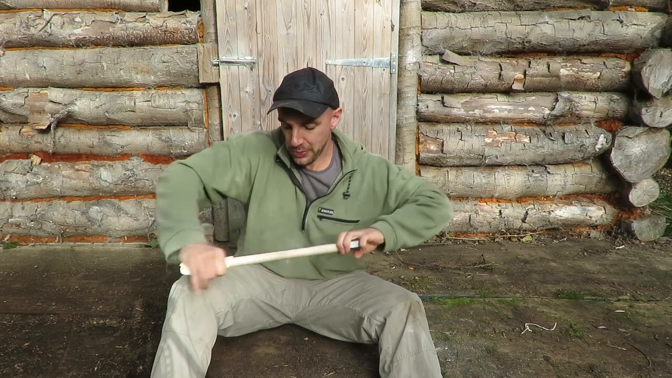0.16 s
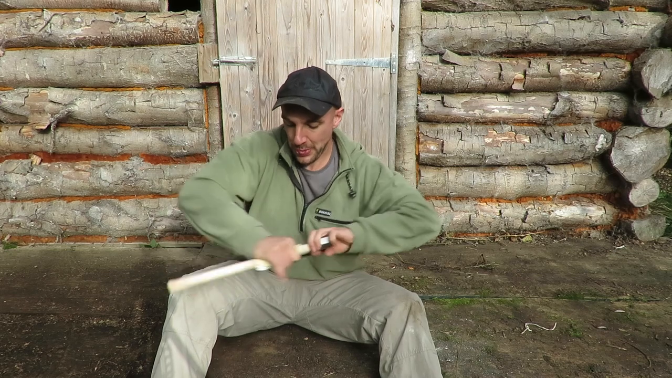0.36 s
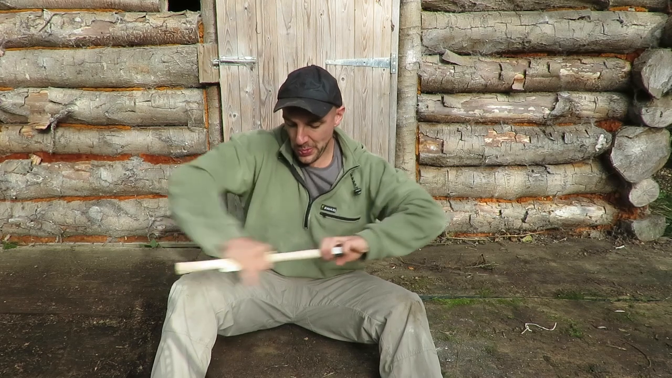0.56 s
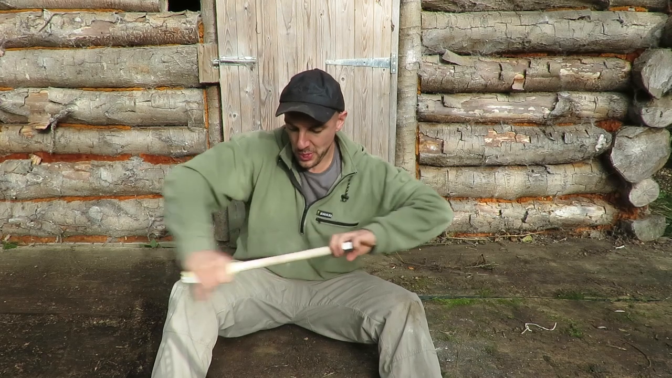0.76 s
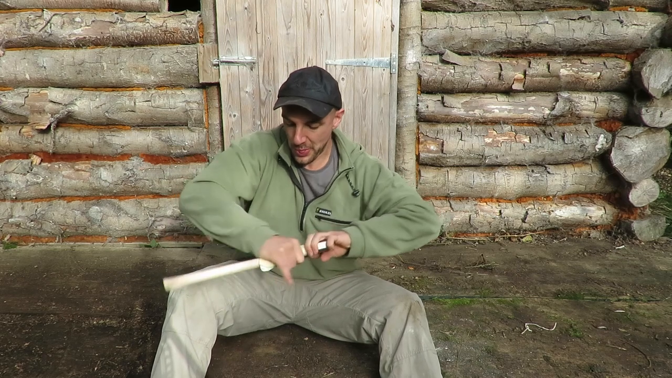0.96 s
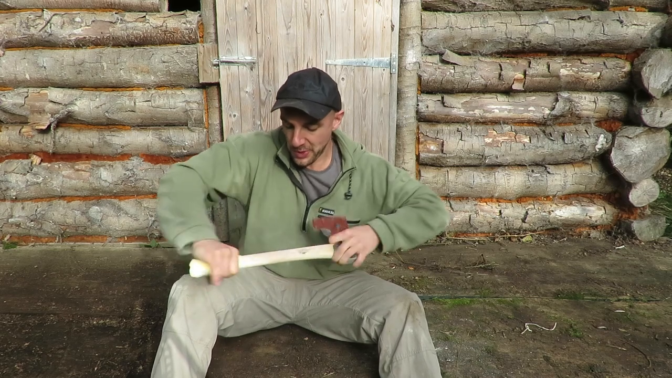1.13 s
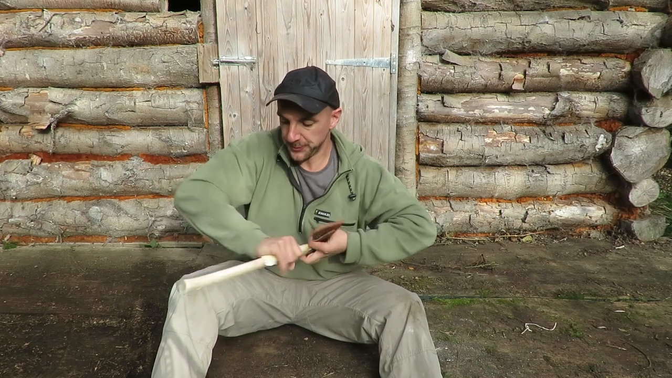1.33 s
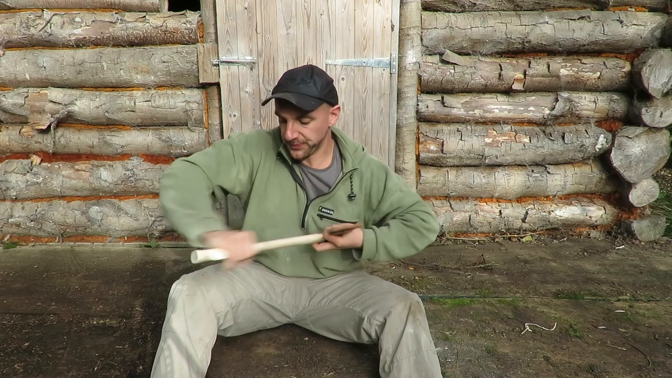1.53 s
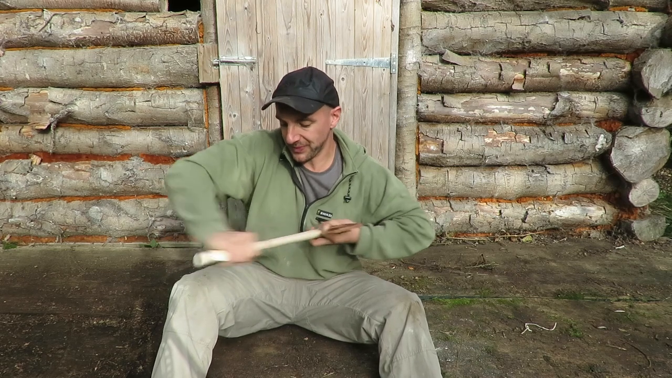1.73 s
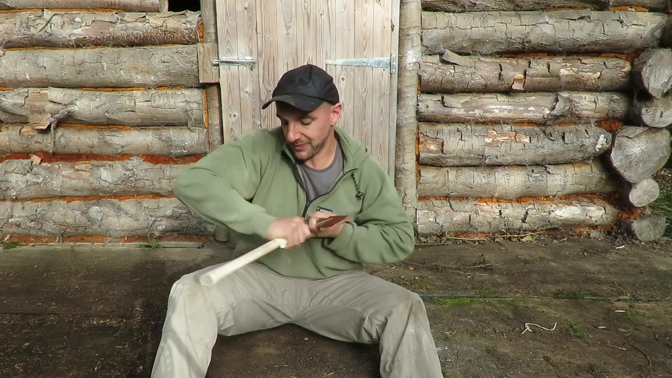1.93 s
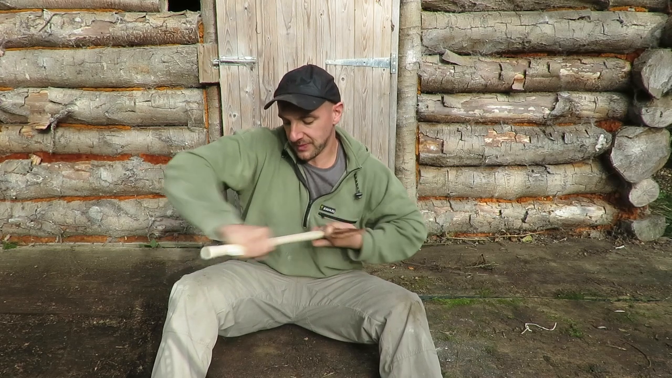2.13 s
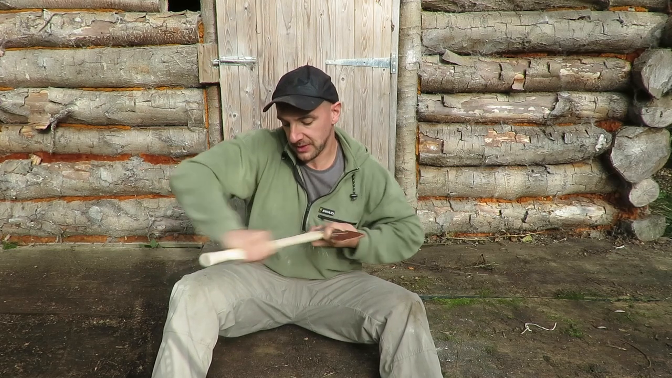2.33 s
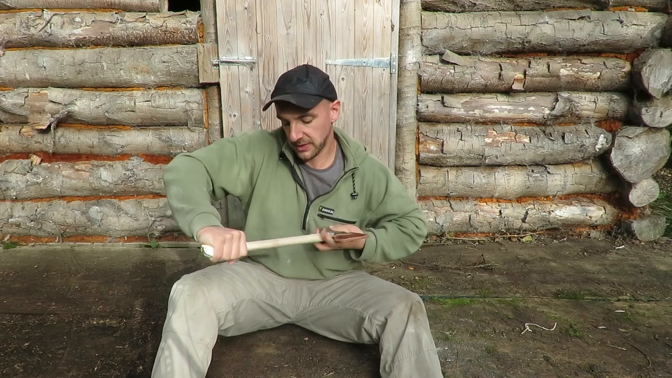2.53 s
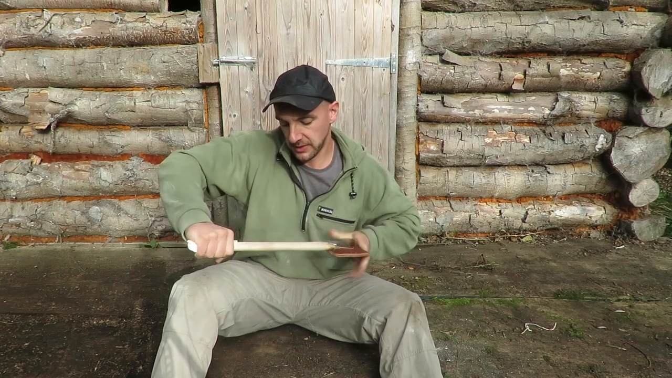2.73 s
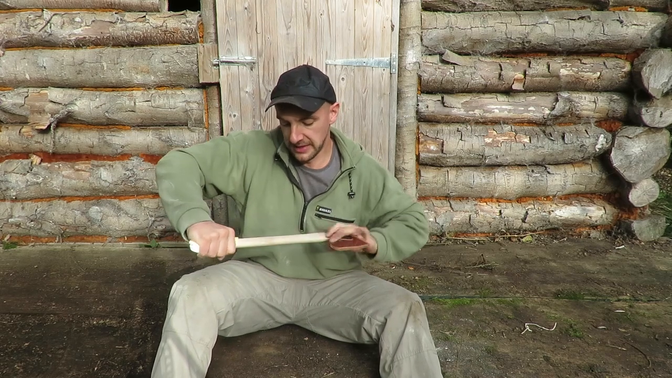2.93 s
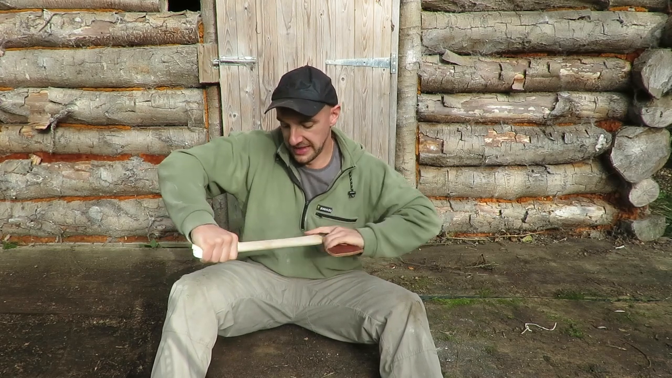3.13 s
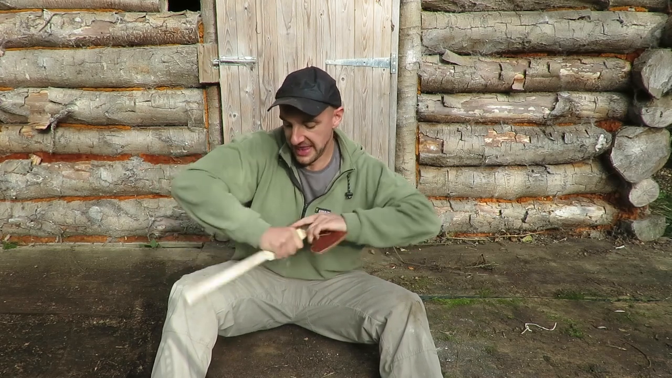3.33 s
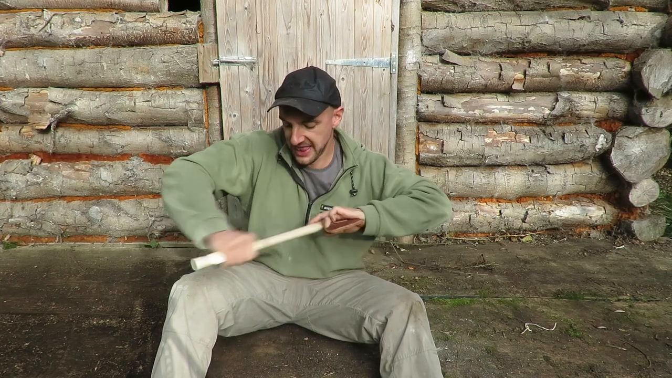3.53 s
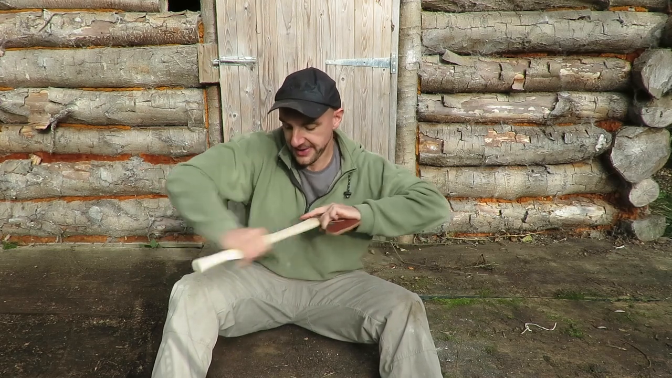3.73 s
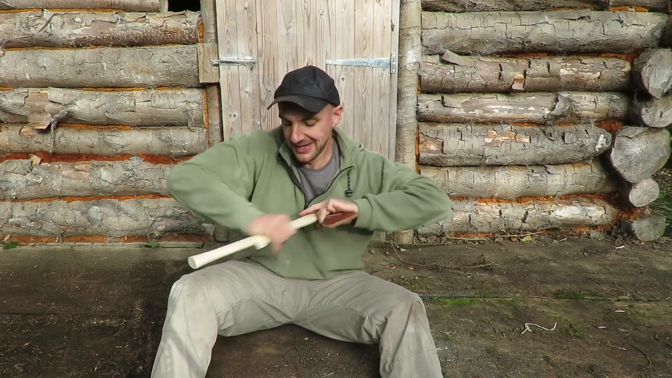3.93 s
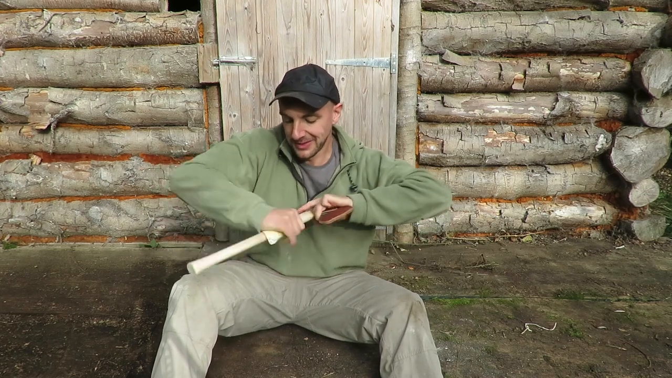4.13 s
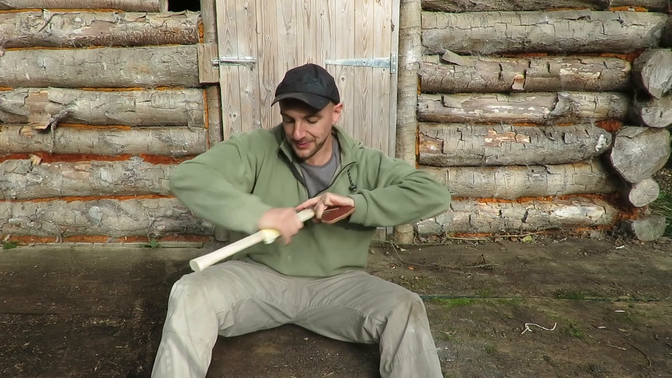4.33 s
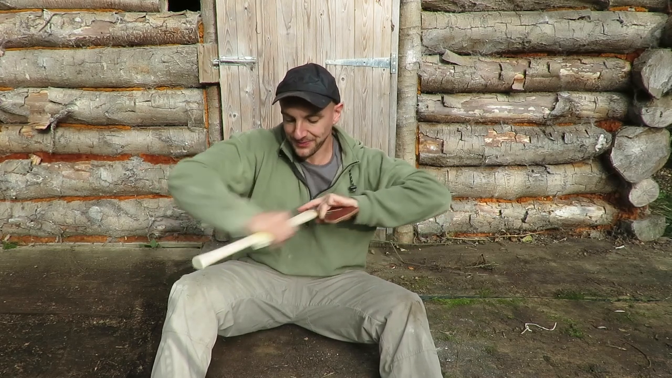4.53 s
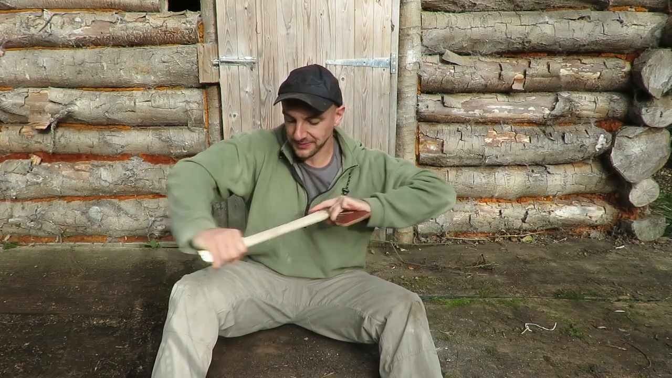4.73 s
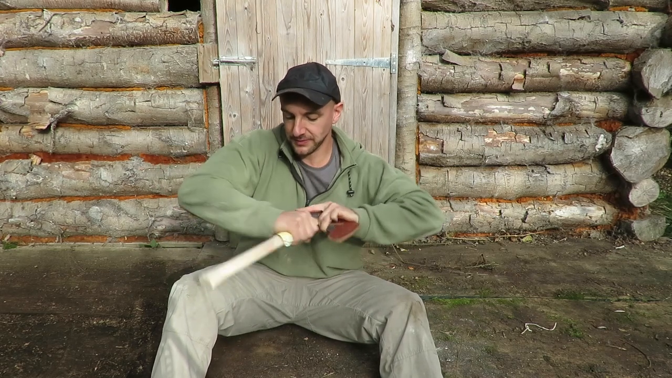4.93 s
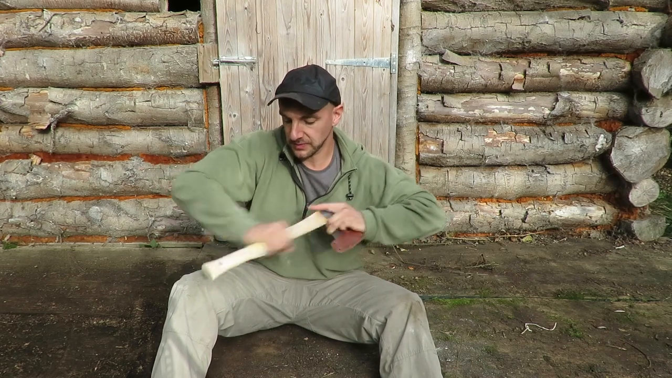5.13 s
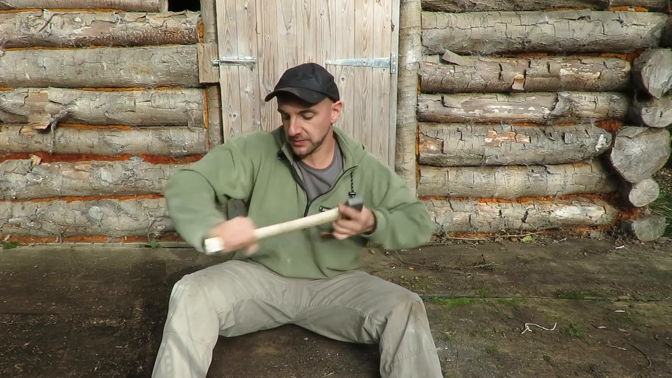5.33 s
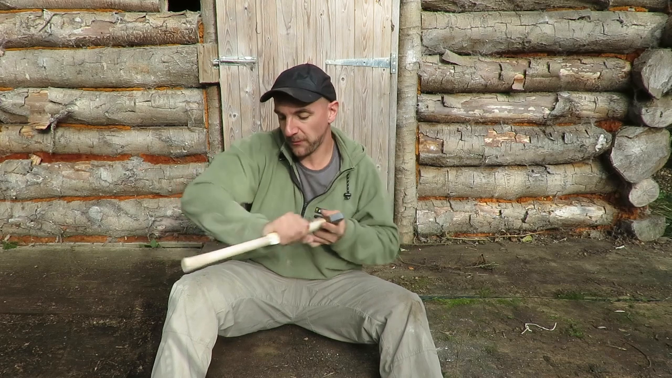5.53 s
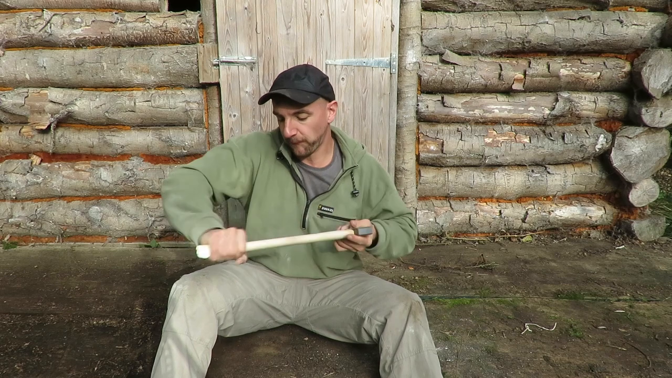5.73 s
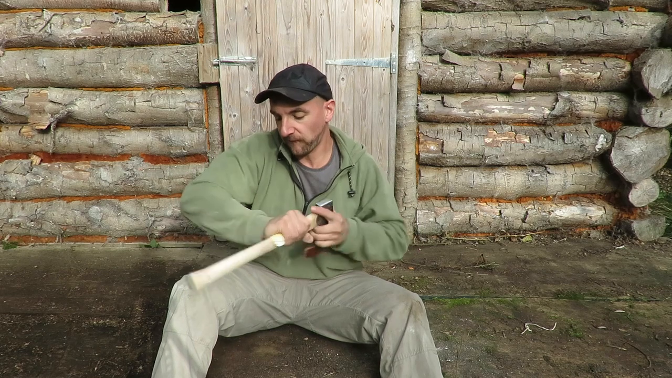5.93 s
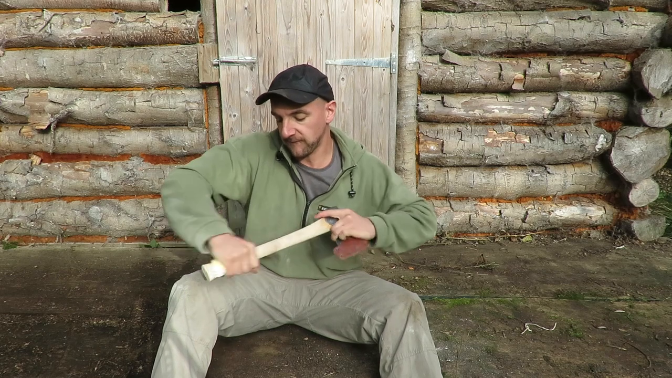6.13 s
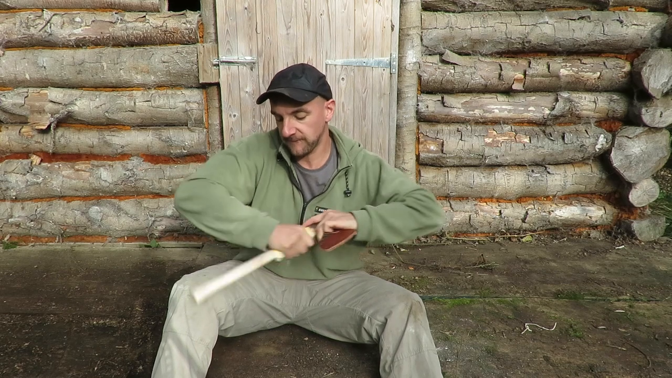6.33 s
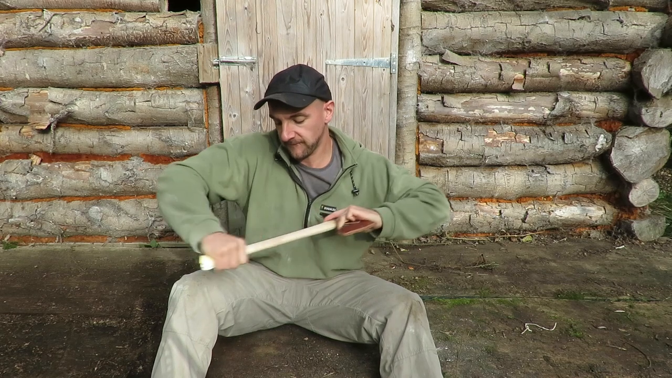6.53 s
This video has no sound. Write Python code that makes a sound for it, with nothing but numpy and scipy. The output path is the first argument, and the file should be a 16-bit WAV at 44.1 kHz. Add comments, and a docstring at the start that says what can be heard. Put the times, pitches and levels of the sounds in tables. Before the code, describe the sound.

Quick, hissing sandpaper strokes rasp on a wooden handle, pause briefly and resume, with soft outdoor air and a far idling engine underneath.

```python
"""Outdoors by a log wall, coarse sandpaper on a wooden handle is rubbed quickly back and forth,
with one short rest. Countless grit scratches hiss, the handle rasps, and the cupped sheet rings
and now and then chatters or snags. The wall close behind throws back a short answer;
a far idling engine and a soft outdoor rush lie underneath."""
import sys
import numpy as np
from scipy import signal
from scipy.fft import rfft, irfft, next_fast_len
from scipy.io import wavfile
from scipy.ndimage import uniform_filter1d, map_coordinates

SR = 44100
rng = np.random.default_rng(int(sys.argv[2]) if len(sys.argv) > 2 else 0)


def waveform_to_disk(signal):
    """Save audio, clipped to [-1, 1], as 16-bit WAV at the path in sys.argv[1]."""
    frames = np.transpose(np.atleast_2d(signal))
    scaled = np.clip(frames, -1, 1) * 32767
    samples = np.round(scaled).astype(np.int16)
    wavfile.write(sys.argv[1], SR, samples)


N = 289825

# The arm's strokes. Each row: start and end in seconds, grit level in dB, its growth over the stroke in dB.
STROKES = [(-.007, 0.119, -19.5, -6), (.127, .274, -18, 4.5), (0.287, .439, -21.5, 3),
           (0.447, .597, -19, 3.5), (0.604, .751, -20.5, 1.5), (0.761, 0.906, -19.5, 3),
           (0.915, 1.071, -23, 4), (1.081, 1.222, -20, 5.5), (1.233, 1.416, -19.5, -4),
           (1.432, 1.586, -22.5, 9), (1.602, 1.742, -22, 4), (1.758, 1.888, -20, 3),
           (1.894, 2.034, -22.5, 4.5), (2.042, 2.177, -21.5, 15), (2.189, 2.331, -22, 7),
           (2.335, 2.501, -21.5, 14), (3.243, 3.401, -23, 11), (3.423, 3.583, -21, 8),
           (3.599, 3.742, -23, 5.5), (3.762, 3.896, -20, 7), (3.897, 4.01, -20, 2), (4.025, 4.14, -20.5, 1),
           (4.14, 4.244, -19.5, -2), (4.255, 4.362, -19.5, -7.5), (4.363, 4.467, -22, -2.5),
           (4.474, 4.585, -22, 7.5), (4.586, 4.697, -20.5, 0), (4.712, 4.865, -20.5, 7),
           (4.905, 5.064, -21, 4), (5.17, 5.352, -20, 2.5), (5.346, 5.585, -24, 21),
           (5.631, 5.774, -20.5, 20), (5.833, 5.989, -21.5, 2), (6.012, 6.201, -21.5, 15),
           (6.198, 6.4, -25.3, 9), (6.415, 6.577, -22.5, 16.5)]
STROKE_S, COAST = 0.16, 1.05  # an ordinary stroke's length; extra braking time per second beyond it


def amp(db):
    """Decibels to gain."""
    return 10 ** (np.asarray(db) / 20)


def unit(x):
    """Scale to rms 1."""
    return x / np.sqrt(np.mean(x ** 2) + 1e-20)


def clock():
    """Each sample's time in seconds."""
    return np.arange(N) / SR


def along(points, hz):
    """Read (Hz, value) points on a log frequency axis."""
    point_hz, values = np.transpose(points)
    return np.interp(np.log(hz + 1), np.log(point_hz + 1), values)


def wobble(rate):
    """A smooth random curve, rate knots a second."""
    return map_coordinates(rng.standard_normal(int(N * rate / SR) + 4), [clock() * rate])


def filtered(x, response):
    """Filter x by a gain given as a function of frequency."""
    size = next_fast_len(N + SR // 2)
    return irfft(rfft(x, size) * response(np.fft.rfftfreq(size, 1 / SR)), size)[..., :N]


def coloured(x, spectrum):
    """Shape x with an EQ curve of (Hz, dB) points, at rms 1."""
    return unit(filtered(x, lambda hz: amp(along(spectrum, hz))))


def swell(middle, length):
    """A smooth bump, length seconds wide at half height."""
    return np.cos(np.pi / 2 * np.clip((clock() - middle) / length, -1, 1)) ** 2


def scratches(rate):
    """Tiny impacts of random size at random moments, rate a second."""
    return unit(rng.standard_normal(N) * (rng.random(N) < rate / SR))


def outdoor_rush():
    """A soft bed of air, almost the same in both ears."""
    # The tone of the air. Each row: frequency in Hz, relative level in dB.
    air_eq = [(15, -42), (25, -19), (42, 8), (52, -14), (68, -6.5), (140, -1), (180, -3.5), (330, -8.5),
              (480, -9), (1000, -8), (1500, -12.5), (2300, -21.5), (6000, -24.5), (15500, -29)]
    side_eq = [(40, -27), (150, 1.5), (400, 9.5), (900, -7.0), (4000, -32.0)]
    mid = amp(-42.5) * coloured(rng.standard_normal(N), air_eq)
    side = amp(-62) * coloured(rng.standard_normal(N), side_eq)
    return mid + side * np.array([[1], [-1]])


def far_engine():
    """An idling engine fires three times a turn; only its lowest orders carry, wavering with the air."""
    # The drifting idle. Each row: time in seconds, firing rate in Hz.
    idle = [(0, 56.95), (1.2, 58.4), (2.2, 56.8), (3.1, 58.5), (4.3, 56.6), (6.57, 60.5)]
    # The hum's partials. Each row: multiple of the shaft's turning rate, level in dB.
    partials = [(2, -57), (3, -43.5), (4, -52), (5, -56), (7, -53.5)]
    firing_hz = np.interp(clock(), *np.transpose(idle)) * (1 + .015 * wobble(6))
    turns = np.cumsum(firing_hz) / SR / 3
    hum = np.zeros(N)
    for order, db in partials:
        gain = np.sqrt(2) * amp(db + 2.4 * wobble(7.1))
        hum += gain * np.sin(2 * np.pi * (order * turns + rng.random()))
    return hum


def wall_answer(x):
    """The log wall and the boards scatter a short tail, 5 ms late."""
    # The tail's decay. Each row: frequency in Hz, seconds to fall 60 dB.
    decay = [(200, 0.18), (2000, 0.12), (12000, 0.27)]
    hz, t, noise = signal.stft(rng.standard_normal(SR // 3), SR, nperseg=256)
    tail = signal.istft(noise * amp(-60 * t / along(decay, hz)[:, None]), SR, nperseg=256)[1]
    return signal.fftconvolve(x, np.pad(tail, (SR // 200, 0)) / np.linalg.norm(tail))[:N]


def paper_rustle():
    """Between strokes the paper shifts faintly in the resting hand."""
    # Each row: middle and length in seconds, level in dB.
    shifts = [(2.834, 0.071, -49), (3.082, .1, -45), (3.226, 0.083, -48.5), (4.899, 0.029, -39),
              (5.135, 0.15, -45)]
    rustle_eq = [(500, -6), (2500, 0), (5000, -7), (11000, -10.5), (15500, -13)]
    rustle = coloured(scratches(rate=3700), rustle_eq)
    return sum(amp(db) * swell(middle, length) for middle, length, db in shifts) * rustle


def handle():
    """The hand-damped wood knocks dully when shoved and squeaks once as the grip turns."""
    # The wood's modes. Each row: pitch in Hz, relative level in dB, seconds to fall 60 dB.
    modes = [(286, -24, 0.0086), (487, 2, 0.0068), (840, 3.5, 0.016), (1280, 1.5, 0.013)]
    # The hand's shoves. Each row: start in seconds, peak in dB.
    knocks = [(1.252, -9), (6.418, -16.5)]
    # A low, falling squeak. Each row: middle and length in seconds, level in dB, first and last pitch in Hz.
    squeaks = [(3.415, .022, -31.5, 405, 325)]
    out, t = np.zeros(N + SR), np.arange(SR // 8) / SR
    ring = sum(amp(db - 60 * t / t60) * np.sin(2 * np.pi * hz * t) for hz, db, t60 in modes)
    for start, db in knocks:
        out[round(start * SR):][:len(t)] += amp(db) * ring / np.abs(ring).max()
    for middle, length, db, first_hz, last_hz in squeaks:
        pitch = np.interp(clock(), [middle - length, middle + length], [first_hz, last_hz])
        out[:N] += amp(db) * swell(middle, length) * np.sin(2 * np.pi * np.cumsum(pitch) / SR)
    return out[:N]


def snags():
    """A caught grain snaps free with a bright crack and a very short ring."""
    # Each row: start in seconds, peak in dB ahead of the low cut, pitch in Hz.
    grains = [(2.706, -26, 3140), (2.822, -29, 6600), (2.826, -31, 3700), (3.042, -25, 2600),
              (4.305, -2, 4230), (4.565, -14, 9800), (6.343, -2, 4700)]
    out, t = np.zeros(N + SR), np.arange(SR // 20) / SR
    for start, db, hz in grains:
        snap = (np.sin(2 * np.pi * hz * t) + .5 * rng.standard_normal(len(t))) * amp(-60 * t / 0.0082)
        out[round(start * SR):][:len(t)] += amp(db) * snap / np.abs(snap).max()
    # so small a source radiates no bass
    return signal.sosfilt(signal.butter(2, 1700, "high", fs=SR, output="sos"), out[:N])


def grip(seconds):
    """The cupped sheet's pitch and level: a looser grip lets it ring lower and louder."""
    # Each row: time in seconds, ring pitch in Hz, sheet level against the grit in dB.
    grip_curve = [(0, 2128, -10), (1.28, 2100, -6), (1.42, 2000, -11.5), (3.3, 2141, -11),
                  (4.3, 2268, -10.5), (5.04, 2150, -9.5), (5.19, 1519, -6), (5.32, 1723, -1),
                  (5.48, 1894, -11), (5.72, 1447, -9.5), (5.95, 1887, -12.5), (6.14, 1518, -2),
                  (6.23, 1847, -1.5), (6.5, 2154, -9)]
    times, hz, db = np.transpose(grip_curve)
    return np.interp(seconds, times, hz), np.interp(seconds, times, db)


def judders(lead_s=0.022, length_s=0.026, trim_db=-1.5, scatter_db=1.2, pitch_ratio=0.91, detune=0.063):
    """The sheet sticks and slips as each stroke brakes: one row of chatter per stroke."""
    rows = []
    for start, end, db, _ in STROKES:
        force, bend = rng.standard_normal(2)
        middle = end - lead_s - COAST * max(end - start - STROKE_S, 0) / 2
        ring_hz, sheet_db = grip(middle)
        level_db = db + sheet_db + trim_db + scatter_db * force
        rows.append((middle, length_s, level_db, ring_hz * pitch_ratio * np.exp(detune * bend)))
    return rows


def chatter():
    """Bursts of rapid slips ring the cupped sheet, in hard grabs and at the end of each stroke."""
    # The hard grabs. Each row: middle and length in seconds, relative level in dB, ring pitch in Hz.
    grabs = [(0.886, 0.024, -36, 1510), (1.268, .024, -15.5, 1720), (1.295, .046, -18.5, 2320),
             (2.322, 0.0072, -31, 1710), (3.389, .01, -24, 2260), (4.933, 0.028, -22, 2520),
             (5.321, .035, -26.5, 1630), (6.346, 0.014, -20, 2300)]
    out, t = np.zeros(N), np.arange(SR // 50) / SR
    for middle, length, db, hz in grabs + judders():
        shape = swell(middle, length)
        on = shape > 1e-6
        # the sheet takes a few cycles to answer, so a slip carries no thump
        ring = t * np.sin(2 * np.pi * hz * t) * amp(-60 * t / 0.0025)
        slips = rng.standard_normal(on.sum()) * (rng.random(on.sum()) < 2500 / SR)
        out[on] += amp(db - 2.5) * shape[on] * unit(signal.fftconvolve(slips, ring)[:on.sum()])
    return out


def cup_ring(braking, width_hz=330, sag=0.15, firm_db=-4.5, db_per_octave=5):
    """The cupped sheet's narrow resonance follows the grip and sags as braking slackens the paper."""
    pitch = grip(clock())[0]
    phase = 2 * np.pi * np.cumsum(pitch * (1 - sag * braking)) / SR
    slow_noise = filtered(rng.standard_normal((2, N)), lambda hz: 1 / (1 + 1j * hz / width_hz) ** 2)
    ring = unit(slow_noise[0] * np.cos(phase) + slow_noise[1] * np.sin(phase))
    octaves_down = np.log2(np.median(pitch) / pitch)
    return amp(firm_db + db_per_octave * octaves_down) * ring


def flexing(x, depth_db, bins, frames=4):
    """The bending sheet and the moving fingers shift many small resonances about."""
    spectra = signal.stft(x, nperseg=1024)[2]
    ripple = uniform_filter1d(rng.standard_normal(spectra.shape), bins, axis=0)
    ripple = uniform_filter1d(ripple, frames, axis=1)
    return signal.istft(spectra * amp(depth_db * unit(ripple)), nperseg=1024)[1][:N]


def arm(rise_s=0.054, brake_s=0.029, jump=0.27, speed_power=1.084):
    """Grit, rasp and sheet gains, speed and braking as the hand breaks loose, speeds up and stops."""
    # How firmly the paper bears on the wood. Each row: time in seconds, rasp against the grit in dB.
    seating = [(0, -4.5), (1.3, -3), (1.72, -0.4), (2.25, -4.5), (3.35, -3.3), (3.5, -4), (4.27, -2),
               (4.85, -2.5), (5.9, -4), (6.5, -3)]
    growth_shares = [1, 0.81, 0.13]  # how much grit, rasp and sheet follow the hand's pressure
    t, gains, speed, braking = clock(), np.zeros((3, N)), np.zeros(N), np.zeros(N)
    ease = lambda u: np.sin(np.pi / 2 * np.clip(u, 0, 1))
    for start, end, db, growth_db in STROKES:
        on = (t > start) & (t < end)
        age, left, length = t[on] - start, end - t[on], end - start
        rise = rise_s * (length / STROKE_S) ** 1.37
        brake = brake_s + COAST * max(length - STROKE_S, 0)
        # static friction lets go at once, so the stroke jumps to part of its speed
        release = np.clip(age / 0.0083, 0, 1)
        speed[on] = release * (jump + (1 - jump) * ease(age / rise)) * ease(left / brake)
        press_db = growth_db * (age / length - .5)
        gains[:, on] += speed[on] ** speed_power * amp(db + np.outer(growth_shares, press_db))
        braking[on] = np.exp(-(left / 0.033) ** 2)
    grit, rasp, sheet = gains
    rasp *= amp(np.interp(t, *np.transpose(seating)))
    sheet *= amp(grip(t)[1])
    return grit, rasp, sheet, speed, braking


def sanding():
    """Grit scratches sound directly, through the handle and through the paper backing."""
    # The four colours of the scratching. Each row: frequency in Hz, relative level in dB.
    grit_eq = [(3290, -25), (5600, -7), (6080, -2), (8030, 1), (11100, 0), (12400, -2.5), (13800, -4.5),
               (14800, -4), (15800, -36)]  # bright, direct hiss
    rasp_eq = [(1650, -32), (2500, -13), (2850, -5.5), (3200, -3.5), (3550, -3.5), (3900, -1), (4200, 2),
               (4650, -0.7), (5300, 1), (5650, -2), (6200, -8), (7500, -20)]  # the wooden handle
    sheet_eq = [(100, -58), (400, -25), (700, -14), (1000, -10.5), (1300, -6.5), (1550, -1), (1950, -1),
                (2200, 0), (2750, -1.5), (3100, -2.5), (5000, -38)]  # the paper backing
    drag_eq = [(150, -20), (400, -11), (850, -6), (1150, 5), (1500, -12), (2500, 6), (5000, -40)]  # grit digging in
    grit, rasp, sheet, speed, braking = arm()
    # the paper never quite stops at a turn: it creeps and rolls in the hand
    creep = amp(-48.5) * np.clip(uniform_filter1d(grit, SR // 16) / amp(-36.0), 0, 1)
    # the wood's uneven fibres make the bite flutter
    bite = amp(1.22 * wobble(55) + 0.32 * wobble(330))
    hiss = coloured(flexing(scratches(rate=30000), depth_db=1.84, bins=6), grit_eq)
    # slow scratches are duller than fast ones
    dull = filtered(hiss, lambda hz: 1 / (1 + (hz / 9000) ** 4))
    hiss = dull + (0.035 + 1.07 * speed) * (hiss - dull)
    wood = coloured(flexing(scratches(rate=20000), depth_db=2, bins=5), rasp_eq)
    paper = amp(0.5) * coloured(scratches(rate=9000), sheet_eq) + cup_ring(braking)
    paper = unit(flexing(paper, depth_db=3.0, bins=4))
    # as the hand brakes, the grit drags, coarser and lower
    drag = coloured(flexing(scratches(rate=1500), depth_db=1.5, bins=3), drag_eq)
    return bite * ((grit + 0.14 * creep) * hiss
                   + (rasp + 1.02 * creep) * wood
                   + amp(0.26) * (sheet + creep) * paper
                   + amp(-10) * braking * grit * drag)


def scene():
    """The work sits dead centre with the wall's answer, over the engine and the air."""
    work = sanding() + chatter() + snags() + handle() + paper_rustle()
    return work + amp(-19.5) * wall_answer(work) + far_engine() + outdoor_rush()


def record(dry):
    """A steep high cut removes the very top of the treble."""
    return filtered(dry, lambda hz: hz < 15850)


dry = scene()
out = record(dry)
waveform_to_disk(out)
```